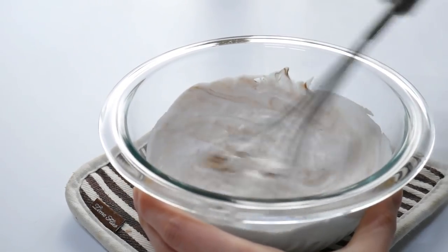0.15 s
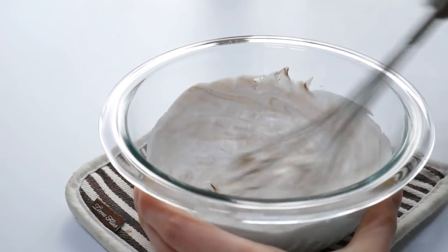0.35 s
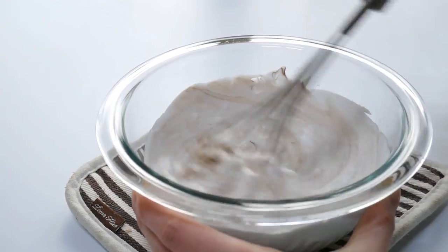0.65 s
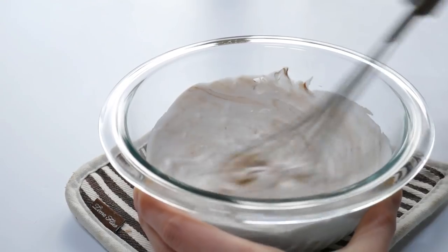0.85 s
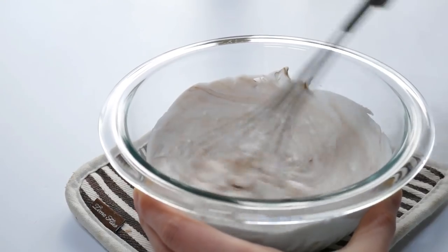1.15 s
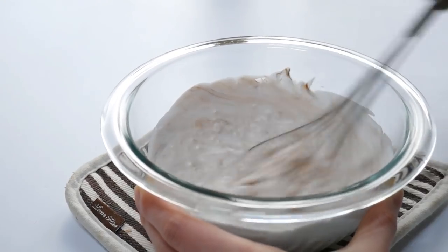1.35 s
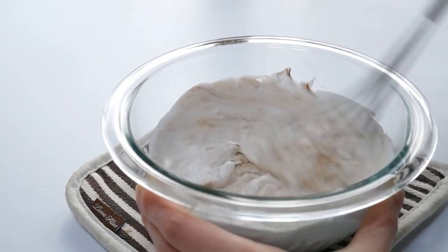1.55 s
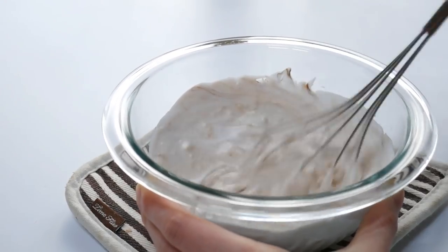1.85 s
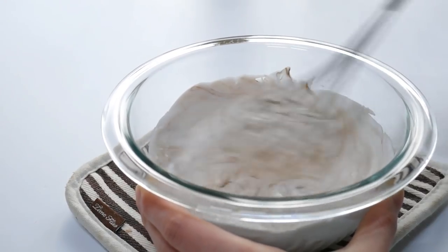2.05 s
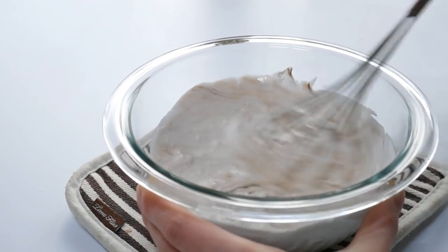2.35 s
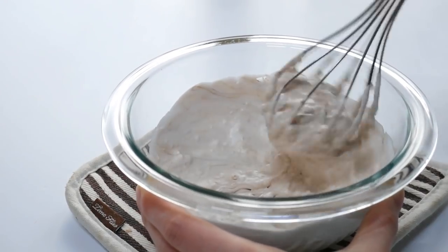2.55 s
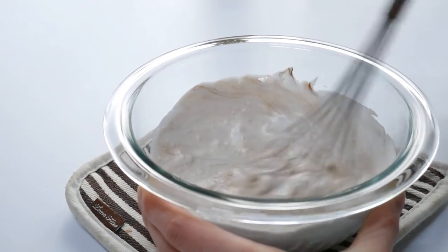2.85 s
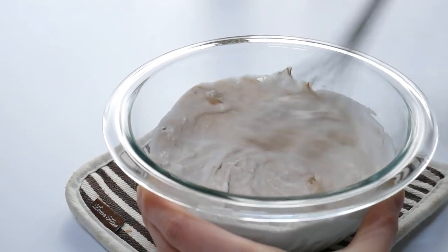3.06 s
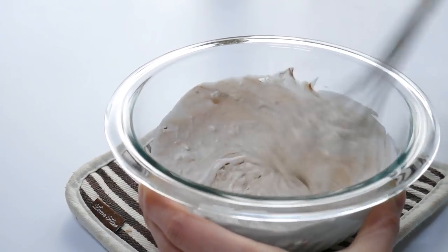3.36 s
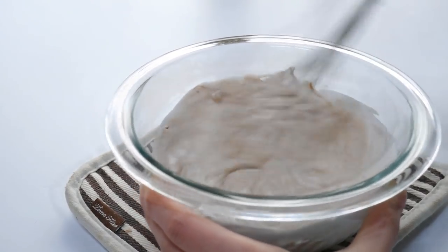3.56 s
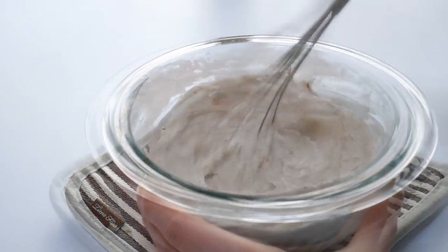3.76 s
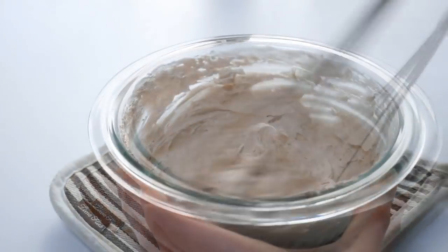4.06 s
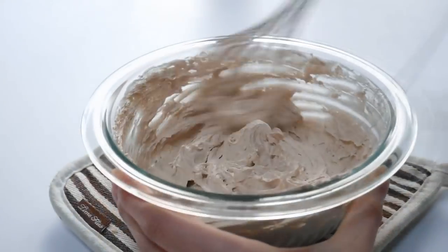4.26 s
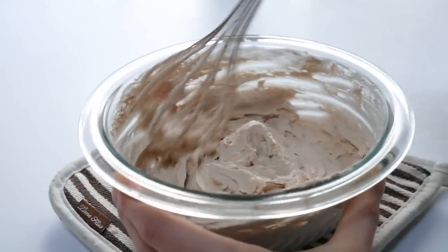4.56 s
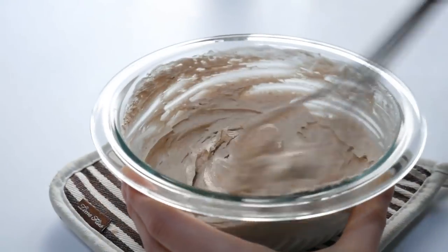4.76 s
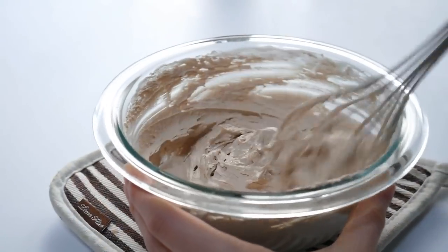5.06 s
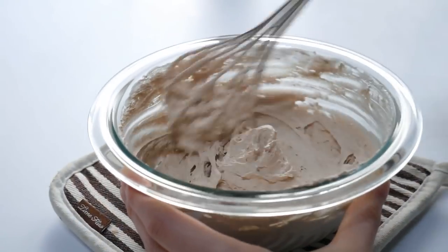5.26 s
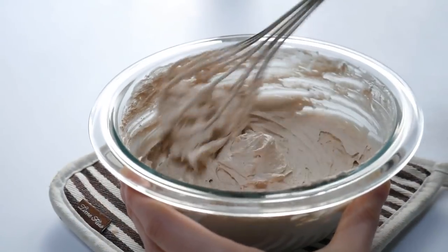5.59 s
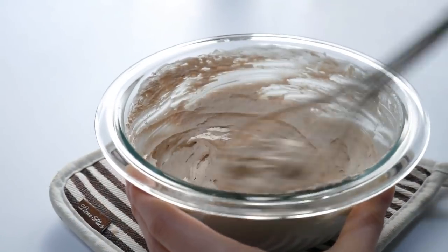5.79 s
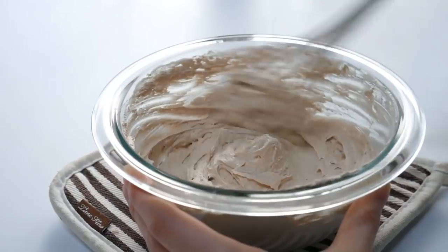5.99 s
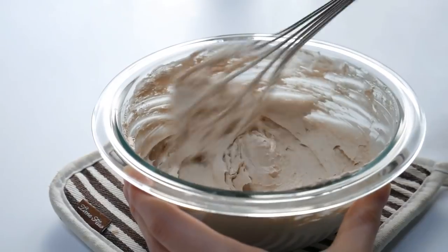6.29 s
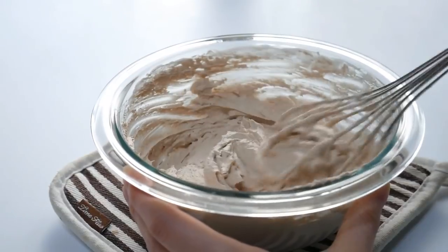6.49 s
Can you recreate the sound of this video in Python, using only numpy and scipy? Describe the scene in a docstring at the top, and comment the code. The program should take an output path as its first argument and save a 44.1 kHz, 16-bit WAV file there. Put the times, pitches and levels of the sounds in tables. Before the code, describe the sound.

In a small kitchen, close and central in stereo, a wire whisk beats thick cream in a glass bowl resting on padded cloth. From 0 to 2.4 seconds, strokes come roughly four per second: crisp wiry clicks with short rattles, gritty scrapes, low wet slaps, squelches and a muffled glassy ring. From about 2.45 to 3.0 the whisk almost rests, leaving faint movement, low room noise and a soft appliance hum. Beating resumes at 3.03, quick and uneven, until about 3.9. At 4.1 an edit abruptly cuts the background, which fades back by 5. Light scrapes lead to a strong clink at 4.7, then denser, irregular strokes with brighter metallic ticks, scraping and clearer singing glass; the cream is stiffer and its slaps weaker. Hard clinks stand out near 5.4 and 6.1, with a final sharp one at 6.54.

```python
"""A wire whisk beats thick cream in a glass bowl: wire bursts tap and scrape, and resonances ring as the glass.
Place: a kitchen, the bowl held on a padded cloth; distance: close and central to a stereo microphone.
Cream slaps as short sine notes and squelches as clumped noise through the bowl's low modes.
Behind it lie room noise and an appliance hum. An edit cuts to a later, stiffer stage whose background fades in:
with the wall wiped barer the glass rings more and the slaps are weaker."""
import sys
import numpy as np
from scipy import signal
from scipy.fft import rfft, irfft, next_fast_len
from scipy.io import wavfile
from scipy.ndimage import map_coordinates

SR = 44100
rng = np.random.default_rng(int(sys.argv[2]) if len(sys.argv) > 2 else 0)


def int16_out(signal):
    """Quantize to a 16-bit WAV file."""
    q = np.round(np.clip(np.atleast_2d(signal).T, -1, 1) * 32767)
    wavfile.write(sys.argv[1], SR, q.astype(np.int16))


N = 292383
CUT_S = 4.088  # t/s of the edit from the wet stage to the stiff one


def whisk():
    """At the bowl: blows and rubbing drive wires and glass, while the cream drives the damped low modes."""
    contact, force, knock = taps()
    rubbing, cream, wiping = sweeps()
    metal = wires(contact, rubbing) + knock
    glass = struck_glass(force) + rubbed_glass(rubbing) + flares()
    wet_sounds = squelch(cream) + swish(wiping) + slaps()
    # everything at the bowl falls away steeply below about 130 Hz
    return filtered(metal + glass + wet_sounds, lambda hz: (1j * hz / (130 + 1j * hz)) ** 2)


# Wires striking the wall, a first wire often just ahead of a heavy blow; levels before the wire and glass filters.
# Columns: t/s, crack level/dB, rattle level/dB re crack, dullness/dB per octave, glass drive level/dB re strike,
# knock f/Hz, knock level/dB re the crack column
WIRE_STRIKES = [(0.0332, -37, -12, 0, -11, 1780, -12), (0.0546, -25, -10.5, -1, -4, 2700, -22),
                (0.0883, -28, -8, -0.5, -7, 1510, -16), (0.2683, -29.5, -15, 0.5, -14, 3030, -28),
                (0.3044, -26, -7.5, -1.5, -7, 2760, -14), (0.542, -30.5, -8.5, -1.5, -9, 1840, -11.5),
                (0.5574, -34.5, -11, 2, -7, 1770, -12), (0.7765, -31, -7, 0, -5, 1770, -21),
                (0.8315, -36, -6, 7, -15, 2060, -18), (1.0244, -28.5, -14, -1.5, -7, 2640, -18),
                (1.069, -28.5, -15, -2.5, 3, 1780, -22), (1.29, -21.5, -8.5, -1, -6, 1835, -15),
                (1.3676, -53, 1, -5, -4, 2060, -11), (1.5285, -36.5, -15, 0, -4, 2810, -25),
                (1.5457, -25.5, -10.5, -4, 0.5, 2570, -12.5), (1.6294, -32.5, -8, 4, -3, 2670, -17),
                (1.778, -30.5, -10, 0, -10.5, 2720, -22), (1.8048, -23.5, -8.5, -0.5, -3, 3037, -14.5),
                (2.002, -41.5, -25, -6, -7, 2020, -20), (2.0318, -46, -1, 2, -9, 1430, -16),
                (2.0595, -25.5, -7.5, -0.5, 0, 1590, -17), (2.1052, -27, -10.5, -1, -2.5, 1460, -18),
                (2.2258, -39, -19, -4.5, -13, 1880, -18), (2.3116, -32.5, -13, 2, -7, 2740, -18),
                (2.342, -32, -9.5, -3, -2, 1784, -9.5), (3.03, -31, -9.5, -1.5, -4, 3040, -13.5),
                (3.0773, -39.5, -12, -5, -7, 1940, -18), (3.1687, -41, -9, 0, 3, 2940, -15),
                (3.201, -37, -11.5, -3, -1, 1410, -18), (3.3136, -19.5, -9.5, -2, -18, 1750, -15),
                (3.3707, -24, -12, -0.5, -14, 3060, -13.5), (3.4183, -33, -9, -4, -7, 3040, -22),
                (3.5197, -47, -6, 14, 0, 2590, -21), (3.5859, -28, -7, -4, -11, 4200, -18),
                (3.6044, -29, -10.5, -4.5, -3, 4060, -23), (3.6606, -28.5, -11, -3, -2, 1459, -20),
                (3.683, -34.5, -5.5, -4, -7, 3050, -21), (3.8376, -23, -8.5, -3.5, -16, 3050, -23),
                (4.0028, -49, -8, 0, -5, 2760, -21), (4.1395, -55, -6, -2, -3, 2980, -18),
                (4.1714, -50, -4, 6, -7, 1410, -18), (4.2557, -45, -9, -4.5, -1, 3020, -38),
                (4.2882, -48, -11, -3, 6, 3033, -18), (4.3387, -36.5, -10.5, -7, 0, 2537, -25),
                (4.4954, -41, -9, 6, -15, 1570, -13), (4.5226, -37, -10, 5, -11, 1878, -10),
                (4.5406, -33.5, -3, 3, -10, 3040, -14), (4.6134, -38, -5, -4.5, -7, 3120, -13),
                (4.6538, -31, -11, -4.5, -13, 3040, -18), (4.6988, -15.5, -12, -5.5, -14, 3012, -11),
                (4.8372, -37, -8, 5, -3, 3040, -20), (4.877, -30.5, -5, 1, -5, 2653, -13),
                (4.9094, -28, -8, 9, -17, 3020, -20), (4.9707, -29.5, -7, 8, -7, 3040, -12),
                (5.0577, -24, -8.5, 4, -4.5, 1749, -18), (5.1207, -19.5, -13.5, -0.5, -7, 3030, -11.5),
                (5.1922, -33, -15, 4, -25, 1829, -14), (5.2382, -33, -6, 8, -5, 3044, -20),
                (5.3134, -24.5, -10, 3, -7, 3120, -24), (5.3965, -20, -7, 0.5, -3, 1555, -15),
                (5.4294, -30, -4, 5, -5, 1550, -18), (5.4505, -25, -5, 4, -7, 2780, -14),
                (5.4929, -27, -20, 1, -20, 1602, -24), (5.563, -34, -10, 1, -8, 2360, -8.5),
                (5.6104, -25.5, -10, 1, -6, 3190, -13), (5.6295, -28.5, -9.5, 3.5, -9, 3240, -12.5),
                (5.7555, -29, -6.5, 1.5, -10, 3240, -14), (5.7771, -27.5, -9.5, -2, -4, 4070, -10),
                (5.882, -39.5, -7, 0, 2, 1460, -15), (5.9509, -24.5, -10, 0.5, -10, 1900, -17),
                (5.9728, -30, -7, 2, -7, 3020, -13), (6.0043, -31.5, -13, 2, -10, 3105, -10),
                (6.0955, -20, -12.5, -2.5, -4, 3040, -10.5), (6.1387, -17.5, -8.5, 1, -5.5, 3040, -16),
                (6.2337, -32.5, -7.5, 0.5, -15, 2240, -15), (6.3058, -27, -9, -0.5, -14, 2970, -14),
                (6.4023, -54, -14, 4, -4, 3040, -20), (6.4827, -43.5, -6, 8, -10, 1750, -8),
                (6.5364, -16.5, -7, 1, -15, 2060, -7.5), (1.2829, -32, -3.5, 0.5, -11, 1990, -30),
                (3.8293, -32, -3.5, 4, -2, 1903, -30), (4.331, -42, -7, -4, -8, 2460, -30),
                (4.6895, -31.5, -2, 4.5, -3, 2650, -26), (5.93, -39, -15, -8, -10, 4200, -10),
                (6.081, -40, -1, 0, -5, 2970, -12), (6.5304, -49.5, -1, 0, -12, 2010, -30)]
RATTLE_T60_S = 0.13  # the wires rattle on after each strike


def taps():
    """Each strike is a crack, a dying rattle of wires and a short knock; also gives the force on the glass."""
    contact, force, knock = np.zeros((3, N + SR))
    t = np.arange(SR // 4) / SR
    bins = np.fft.rfftfreq(len(t), 1 / SR)
    octaves = np.log2(bins / 4000 + 0.3)
    chatter = np.pad(amp(1.15 * wobble(220)), (0, SR))  # the wires bounce unevenly
    for s, db, rattle_db, dull_db, ring_db, knock_hz, knock_db in WIRE_STRIKES:
        start = round(s * SR)
        at = slice(start, start + len(t))
        crack = amp(-60 * t / 0.009) * (1 - np.exp(-t / 0.0004))
        rattle = chatter[at] * amp(rattle_db - 60 * t / RATTLE_T60_S) * (1 - np.exp(-t / 0.0018))
        burst = amp(db - 6) * (crack + rattle) * rng.standard_normal(len(t))
        # a different set of wires lands each time, so each strike has its own colour
        own_db = 3.5 * map_coordinates(rng.standard_normal(40), [bins / 600])
        contact[at] += irfft(rfft(burst) * amp(own_db - dull_db * octaves), len(t))
        force[at] += amp(ring_db) * burst
        knock[at] += amp(db + knock_db - 60 * t / 0.036) * np.sin(2 * np.pi * knock_hz * t)
    return contact[:N], force[:N], knock[:N]


# Sweeps of the whisk round the bowl; levels before the filters of each sound.
# Columns: peak t/s, build t/s per 20 dB (at least 0.01), fade t/s per 20 dB (at least 0.02),
# wire scrape level/dB, cream squelch level/dB, swish along the wall level/dB
WHISK_SWEEPS = [(0.088, 0.03, 0.11, -52, -42.5, -44.5), (.26, .03, -0.8, -70, -54, -50.5),
                (0.329, 0.04, 0.36, -56, -45, -51), (0.568, .06, 0.27, -53, -45, -51.5),
                (.85, 0.18, 0.1, -49, -43.5, -49.5), (1.078, 0.18, 0.3, -53.5, -47.5, -50.5),
                (1.302, 0, 0.2, -49.5, -42, -47), (1.5, 0.14, 0.8, -70, -48, -56),
                (1.589, 0.16, 0.09, -47.5, -44.5, -48), (1.818, 0.2, 0.8, -57.5, -47.5, -53),
                (2.109, -0.23, 0.11, -47, -39, -45), (2.23, 8, 0.66, -67, -65, -59.5),
                (2.35, .06, 0.3, -54, -47.5, -51.5), (2.49, -0.2, 0.17, -64, -55, -52.5),
                (3.05, -0.22, .4, -58, -51.5, -51), (3.24, 0.04, -0.2, -60, -51, -62),
                (3.32, -0.01, 0.24, -45, -42.5, -46.5), (3.44, -0.15, -0.5, -68, -47, -56),
                (3.53, -7, -2, -64, -70, -64), (3.602, -0.2, 0.15, -49, -42.5, -47.5),
                (3.71, 0.3, 0.3, -60, -52, -58), (3.849, -0.03, 0.19, -52, -41, -49.5),
                (3.98, 1, .3, -66, -54, -60.5), (4.27, 0.23, 3, -63.5, -71, -70.5),
                (4.34, 0.05, 0.08, -52.5, -54, -58), (4.52, 0.08, 6, -55, -74, -69),
                (4.62, 0.23, 1.5, -54.5, -61, -72), (4.702, 0.06, 0.26, -42.5, -57, -60),
                (4.89, -0.27, .4, -46, -59, -55), (4.99, -0.5, 0.2, -47.5, -53.5, -57),
                (5.09, 2.6, 2, -49, -68, -60), (5.24, .1, 1, -49, -55, -54),
                (5.318, 0.26, -0.05, -45.5, -51, -58), (5.41, .04, -0.05, -40, -50, -43),
                (5.659, 0.1, 0.1, -50, -46, -46.5), (5.798, -0.2, 0.1, -43.5, -56, -50),
                (5.93, .06, 0.57, -49.5, -62, -58), (6.01, .15, 0.44, -52.5, -51.5, -51),
                (6.15, 0, 0.03, -43, -58, -39.5), (6.33, 0.7, 0.35, -63, -57, -56.5),
                (6.44, 0.8, 0.14, -57.5, -58, -68), (6.55, -0.02, 0.3, -45.5, -55, -46.5)]
# Whisk barely moving in the wet stage. Columns: scrape level/dB, squelch level/dB, swish level/dB
WET_REST_DB = (-72.5, -63, -80)


def sweeps():
    """Gains of scrape, squelch and swish as the whisk passes, never quite still in the wet stage."""
    resting = np.outer(amp(WET_REST_DB), wet_stage())
    return np.maximum(swells(WHISK_SWEEPS), resting)


# Colour of wire on glass, before a common gain. Columns: f/Hz, relative level/dB per Hz
WIRE_COLOUR = [(300, -27), (700, -16), (1400, -13), (1800, -12), (2200, -16), (3100, -14.5), (3600, -17),
               (5300, -15), (7700, -21), (9900, -15.5), (14500, -28.5), (17000, -9.5)]


def wires(contact, rubbing):
    """Strikes and scrape share one wire colour; the scrape is clumped slips and single flicks."""
    scrape = rubbing * (grit(3.6, 60, clump_db=2.5) + amp(9.5) * ticks(90))
    return filtered(contact + scrape, lambda hz: amp(17.0) * colour(WIRE_COLOUR)(hz))


def ticks(rate):
    """Single wires flick the glass now and then: random noise ticks, rate a second, gone in milliseconds."""
    starts = (rng.random(N) < rate / SR) * amp(3 * rng.standard_normal(N))
    decay = amp(-60 * np.arange(200) / SR / 0.0019)
    return np.convolve(starts, decay)[:N] * rng.standard_normal(N)


# Main low ring of the glass, split and damped by the hand. Columns: f/Hz, width f/Hz, relative level/dB
SPLIT_LOW_RING = [(1150, 35, 0), (1095, 40, -3), (1270, 40, -10)]
# Other rings of the glass. Column: f/Hz
GLASS_RINGS_HZ = [447, 2000, 3052, 3357, 4230, 5610, 6840, 8450, 9640, 10000, 11600]
# Their damping and strength, in the same order. Columns: width f/Hz, relative level/dB
GLASS_RING_MODES = [(30, -4.5), (25.2, -23), (20.2, -18), (16, -19), (50, -14), (37.2, -2.5), (24, -6),
                    (45.5, -3.5), (35, -32), (76, -13), (79.4, -9.5)]


def glass_rings():
    """Response of the bowl's rings apart from the split low one."""
    return modes([(hz, *mode) for hz, mode in zip(GLASS_RINGS_HZ, GLASS_RING_MODES)])


def struck_glass(force):
    """Blows set the resonances of the glass ringing."""
    return amp(18) * filtered(force, glass_rings()) + amp(19) * filtered(force, modes(SPLIT_LOW_RING))


# Rubbed rings against the scrape gain. Columns: wet stage level/dB, stiff stage level/dB
RUBBED_RINGS_DB = (-15, -16.5)


def rubbed_glass(rubbing):
    """Slipping wires keep the rings of the glass faintly excited."""
    rings = unit(filtered(grit(3.0, 43, clump_db=-5.0), glass_rings()))
    return rubbing * by_stage(RUBBED_RINGS_DB) * rings


# Short flares of singing glass set off by rubbing; levels before the bowl's bass cut.
# Columns: peak t/s, fade t/s per 20 dB (at least 0.02), low ring level/dB, low ring f/Hz, second ring level/dB
SINGING_FLARES = [(.09, 2, -66, 1108, -76), (0.341, 0, -49, 1145, -59), (.59, -0.3, -60, 1202, -73),
                  (.79, 0.6, -60.5, 1140, -76), (1.06, 3, -69, 1114, -78), (1.29, -0.04, -54, 1152, -63),
                  (1.55, 0.5, -58.5, 1152, -75), (1.81, -0.12, -44, 1146, -52.5),
                  (2.06, 0.4, -58.5, 1100, -72), (2.23, .05, -57.5, 1110, -80),
                  (2.35, 0.22, -56, 1096, -77), (2.601, -0.42, -53.5, 1127, -95),
                  (3.05, 0.11, -47, 1144, -60), (3.24, -0.15, -51.5, 1143, -80),
                  (3.33, -0.2, -49, 1170, -46), (3.39, 0.05, -43, 1145, -62), (3.45, -0.03, -45, 1146, -77),
                  (3.549, -0.1, -52, 1137, -88), (3.64, 0.8, -58, 1156, -73),
                  (3.71, -0.48, -60, 1152, -51.5), (3.84, 0.03, -60, 1155, -51), (4.21, 0, -84, 1140, -62),
                  (4.26, 0.05, -67, 1137, -62), (4.35, 0.03, -56, 1165, -73),
                  (4.5, 0.4, -49.5, 1096, -62.5), (4.56, 0.5, -54, 1150, -54.5),
                  (4.709, 0.11, -39.5, 1115, -41.5), (4.898, 0.1, -46.5, 1131, -48.5),
                  (4.991, 0.1, -44, 1138, -52), (5.07, .07, -42.5, 1160, -57), (5.13, .08, -60, 1136, -54),
                  (5.24, 0.4, -52, 1135, -54.5), (5.33, 0.01, -42.5, 1146, -46),
                  (5.42, 0.03, -38, 1150, -54), (5.63, 0.05, -49, 1134, -40), (5.679, 0.2, -48, 1128, -59),
                  (5.77, 0.02, -60, 1155, -46), (5.92, 0.8, -56, 1146, -64), (6.02, 0.12, -44, 1125, -53),
                  (6.11, 0.06, -48, 1140, -43), (6.16, 0, -43, 1125, -47), (6.31, 0.06, -53, 1154, -51),
                  (6.552, .12, -38.5, 1162, -37.5)]
# Pair of high rings that join each flare. Column: f/Hz
HIGH_PAIR_HZ = [5610, 8450]
FLARE_BUILD_S, SECOND_RING_HZ = 0.018, 3052  # build t/s per 20 dB, f/Hz
HIGH_FLARE_DB = -11.5  # each high ring, level/dB re second ring


def flares():
    """Rubbing makes the glass sing; the cream on the wall detunes the low ring anew each time."""
    rows = [(s, FLARE_BUILD_S, fade_s, low_db, second_db)
            for s, fade_s, low_db, _, second_db in SINGING_FLARES]
    low, second = swells(rows)
    low_hz, = curves([(row[0], row[3]) for row in SINGING_FLARES])
    high = amp(HIGH_FLARE_DB) * (tone(HIGH_PAIR_HZ[0], 35.3) + tone(HIGH_PAIR_HZ[1], 39.5))
    return low * tone(low_hz, 25) + second * (tone(SECOND_RING_HZ, 40) + high)


def tone(hz, waver_hz):
    """An unsteady ring of rms 1, broken up as wires touch and leave the glass."""
    breaks = amp(4 * wobble(110))
    phase = 2 * np.pi * np.cumsum(hz + waver_hz * wobble(90)) / SR
    return unit(breaks * np.sin(phase))


# Cream-loaded bowl on its pad, low and middle modes. Columns: f/Hz, width f/Hz, relative level/dB
WET_BOWL = [(253, 82, -1.5), (341, 72, 2.5), (474, 30, -4), (534, 81, -6.5)]
# The same with the cream stiffer and higher on the wall. Columns: f/Hz, width f/Hz, relative level/dB
STIFF_BOWL = [(324, 93, -3), (456, 37, 0), (548, 70, -10.5)]


def squelch(cream):
    """Lumpy cream shakes the damped bowl, whose modes depend on the stage."""
    lumps = grit(1.6, 35, clump_db=1.5)
    wet = unit(filtered(lumps, modes(WET_BOWL)))
    stiff = unit(filtered(lumps, modes(STIFF_BOWL)))
    return cream * np.where(wet_stage(), wet, stiff)


# Resonances of the swish along the wall. Columns: f/Hz, width f/Hz, relative level/dB
WALL_MODES = [(646, 40, -3), (786, 47, 2), (950, 46, 5.5), (1022, 74, 1), (1440, 2000, -13.5)]


def swish(wiping):
    """The whisk wipes along the wall: clumped noise through the wall's modes."""
    return wiping * unit(filtered(grit(1.8, 45, clump_db=3.5), modes(WALL_MODES)))


# Lumps of cream slapping the bowl. Columns: t/s, level/dB before the note's envelope, f/Hz
CREAM_SLAPS = [(0.058, -35, 328), (0.101, -39, 326), (0.262, -40, 320), (0.305, -35.5, 327),
               (0.334, -35, 362), (0.37, -40, 344), (0.54, -35.5, 364), (0.6, -34.5, 295),
               (0.803, -42, 332), (0.827, -32.5, 370), (0.878, -34, 330), (1.068, -41, 264),
               (1.116, -44, 274), (1.29, -27, 336), (1.544, -33, 283), (1.616, -29, 305),
               (1.78, -35.5, 270), (1.81, -32, 344), (1.84, -33, 358), (2.06, -31, 342),
               (2.106, -31.5, 310), (2.311, -41, 333), (2.342, -37, 324), (2.472, -44, 333.5),
               (3.031, -43, 386), (3.059, -33.5, 311), (3.315, -33.5, 277), (3.36, -29, 263),
               (3.424, -37, 298), (3.519, -43, 284), (3.593, -28.5, 284), (3.662, -33, 307),
               (3.688, -36, 362), (3.838, -33, 324), (4.688, -43, 521), (4.971, -42.5, 385),
               (5.121, -44, 341.7), (5.313, -38, 361), (5.397, -36.5, 436), (5.951, -46, 246),
               (6.002, -40, 351), (6.533, -45, 366.6)]
# Blows knock the bowl wall. Columns: t/s, level/dB before the note's envelope, f/Hz
WALL_KNOCKS = [(0.057, -38, 904), (0.09, -31, 983), (0.259, -39.5, 592), (0.307, -43, 880),
               (0.543, -38, 786), (0.56, -34, 983), (0.6, -37, 780), (0.78, -37.5, 950), (1.018, -47, 960),
               (1.29, -33.5, 926), (1.487, -44, 960), (1.546, -33.5, 1006), (1.576, -42, 970),
               (1.779, -40, 1110), (1.805, -37, 1130), (2.063, -35.5, 1156), (2.106, -38, 940),
               (2.221, -48, 964), (2.296, -41, 792), (3.033, -34.5, 1122), (3.313, -44, 1180),
               (3.369, -36, 1145), (3.518, -43, 956), (3.589, -34.5, 1170), (3.659, -39, 1140),
               (3.839, -37.5, 713), (4.48, -50.5, 1135), (4.497, -43, 1135), (4.542, -45, 1120),
               (4.704, -38, 1100), (4.879, -37, 1110), (4.969, -31.5, 1206), (4.992, -30, 1131),
               (5.06, -31.5, 1113), (5.121, -49, 1140), (5.226, -41, 1113), (5.317, -28, 1130),
               (5.399, -24, 1106), (5.609, -46, 1120), (5.662, -32.5, 1045), (5.757, -43, 1171),
               (5.951, -52, 958), (6.003, -30.5, 1030), (6.098, -35, 1090), (6.139, -29, 962),
               (6.536, -32, 1127)]


def slaps():
    """Lumps of cream land low and dull; wall knocks are higher and shorter."""
    return notes(CREAM_SLAPS, 0.07, 0.00082) + notes(WALL_KNOCKS, 0.032, 0.00068)


def notes(table, t60, attack):
    """Soft damped sine notes of a few cycles."""
    out, t = np.zeros(N + SR), np.arange(SR // 8) / SR
    for s, db, hz in table:
        note = np.sin(2 * np.pi * hz * t) * amp(-60 * t / t60) * (1 - np.exp(-t / attack))
        out[round(s * SR):][:len(t)] += amp(db) * note
    return out[:N]


# How long the kitchen answers. Columns: f/Hz, t60 t/s
ROOM_DECAY = [(200, 0.2), (1500, 0.33), (10000, 0.25)]


def room(x):
    """Each frequency of the kitchen's answer dies at its own speed; the edit cuts the first stage's tail."""
    hz, t, z = signal.stft(rng.standard_normal((2, SR // 2)), SR, nperseg=256)
    decay = amp(-60 * t / along(ROOM_DECAY, hz)[:, None])
    tail = signal.istft(z * decay, SR, nperseg=256)[1]
    # the answer starts 150 samples after the direct sound
    tail = np.pad(tail / np.linalg.norm(tail[0]), ((0, 0), (150, 0)))
    early = wet_stage()

    def answer(part):
        return signal.fftconvolve(part[None], tail, axes=1)[:, :N]

    return early * answer(early * x) + answer(~early * x)


# Kitchen background, cut off by the edit and fading in again. Columns: t/s, level/dB of noise and hum together
BACKGROUND_LEVEL = [(0, -54.5), (2, -54.5), (4.086, -54), (4.09, -84), (4.2, -70.5), (4.5, -61), (5, -54.5),
                    (5.5, -54.5), (6.63, -55)]
# Colour of the room noise. Columns: f/Hz, relative level/dB per Hz
AIR_COLOUR = [(12, -71), (20, -44), (34, -23), (87, -18), (108, -12), (174, -5.5), (286, -11.5),
              (347, -19.5), (445, -12.5), (525, -13.5), (656, -26), (733, -16.5), (2100, -30), (15000, -40)]
# Likeness of the room noise at left and right. Columns: f/Hz, correlation (-1 to 1)
AIR_LIKENESS = [(60, 0.23), (180, 0.77), (550, -0.82), (1650, -0.61), (4970, -0.35), (15000, 0.12)]
HUM_HZ, HUM_DB = 118, -6.5  # centre f/Hz, sine amplitude level/dB re background level


def kitchen():
    """Further off: broad room noise and a slightly unsteady appliance hum."""
    def mid_side(hz):
        turn = np.arccos(np.clip(along(AIR_LIKENESS, hz), -1, 1)) / 2
        return amp(along(AIR_COLOUR, hz)) * [np.cos(turn), np.sin(turn)]

    mid, side = filtered(rng.standard_normal((2, N)), mid_side)
    air = unit(np.array([mid + side, mid - side])) * amp(3.2 * wobble(6.6))
    phase = 2 * np.pi * np.cumsum(HUM_HZ + 1.8 * wobble(8)) / SR
    hum = np.sin(phase) * amp(HUM_DB + 1.5 * wobble(6))
    level, = curves(BACKGROUND_LEVEL)
    return amp(level) * (air + hum)


def amp(db):
    """dB to gain."""
    return 10 ** (np.asarray(db) / 20)


def unit(x):
    """Scaled to rms 1."""
    return x / np.sqrt(np.mean(x ** 2) + 1e-20)


def along(points, hz):
    """(f/Hz, value) points read on a log frequency axis."""
    f, v = np.transpose(points)
    return np.interp(np.log(hz + 1), np.log(f + 1), v)


def curves(rows):
    """One value per sample for each column after the time."""
    s, *cols = np.transpose(rows)
    return [np.interp(np.arange(N) / SR, s, c) for c in cols]


def wobble(rate):
    """A smooth random curve, rate knots a second."""
    return map_coordinates(rng.standard_normal(int(N * rate / SR) + 4), [np.arange(N) * rate / SR])


def wet_stage():
    """True for each sample before the edit."""
    return np.arange(N) < CUT_S * SR


def by_stage(db):
    """One gain before the edit, another after it."""
    return amp(np.where(wet_stage(), *db))


def swells(rows):
    """Gains for (peak s, build s, fade s, peaks dB): each builds and fades within its own stage."""
    t, gains = np.arange(N) / SR, np.zeros((len(rows[0]) - 3, N))
    for s, build_s, fade_s, *peaks_db in rows:
        near = slice(max(round((s - 0.4) * SR), 0), round((s + 0.8) * SR))
        since = t[near] - s
        shape_db = 20 * np.where(since < 0, since / max(build_s, 0.01), -since / max(fade_s, 0.02))
        same_stage = (t[near] < CUT_S) == (s < CUT_S)
        swell = same_stage * amp(shape_db + np.c_[peaks_db])
        gains[:, near] = np.maximum(gains[:, near], swell)
    return gains


def grit(spread_db, clump_rate, clump_db):
    """Tiny slips of uneven size that come in clumps, rms 1."""
    size_db = spread_db * np.minimum(rng.exponential(size=N), 6)
    return unit(rng.standard_normal(N) * amp(size_db + clump_db * wobble(clump_rate)))


def filtered(x, response):
    """x times a complex response of frequency."""
    m = next_fast_len(N + SR // 2)
    return irfft(rfft(x, m) * response(np.fft.rfftfreq(m, 1 / SR)), m)[..., :N]


def modes(table):
    """Causal response of a set of resonances, their signs alternating."""
    def response(f):
        total = 0
        for k, (centre, width, db) in enumerate(table):
            damping = 1j * f * abs(width)
            total = total + (-1) ** k * amp(db) * damping / (centre * centre - f * f + damping)
        return total
    return response


def colour(points):
    """Causal response with the gains of a spectrum, by folding its cepstrum."""
    def response(hz):
        cepstrum = irfft(np.log(amp(along(points, hz)) + 1e-6))
        half = len(cepstrum) // 2
        cepstrum[1:half] *= 2
        cepstrum[half + 1:] = 0
        return np.exp(rfft(cepstrum))
    return response


# Stereo balance of the whole scene. Columns: f/Hz, left minus right level/dB
STEREO_LEAN = [(60, 7.5), (180, 1), (550, 2), (1650, -1), (4970, 0.0), (15000, 0)]


def scene():
    """The whisk close and central, its room answer partly shared by both sides, the kitchen behind."""
    near = whisk()
    wet = room(near)
    both = near + amp(-7.5) * (wet + 0.094 * wet[::-1]) + kitchen()
    return filtered(both, lambda hz: amp(np.outer([0.5, -0.5], along(STEREO_LEAN, hz))))


# Steep treble cut-off. Columns: f/Hz, level/dB
TREBLE_CUTOFF = [(15000, -1), (15400, -40), (16450, -43)]
NOTCH_HZ, NOTCH_WIDTH_HZ, TOP_HZ = 7930, 110, 16450  # f/Hz of the dip, its width, the band limit


def record(dry):
    def response(hz):
        notch = 1 - 0.52 * np.exp(-((hz - NOTCH_HZ) / NOTCH_WIDTH_HZ) ** 2)
        return notch * amp(along(TREBLE_CUTOFF, hz)) * (hz < TOP_HZ)
    return filtered(dry, response)


dry = scene()
out = record(dry)
int16_out(out)
```